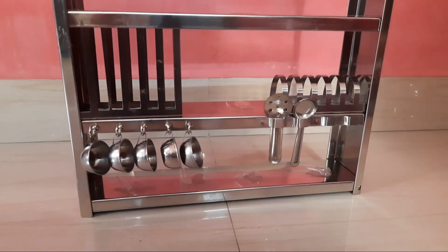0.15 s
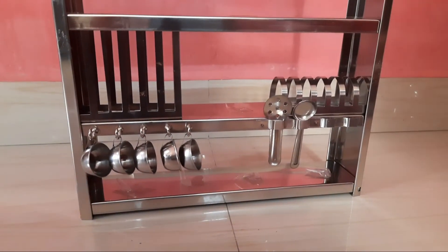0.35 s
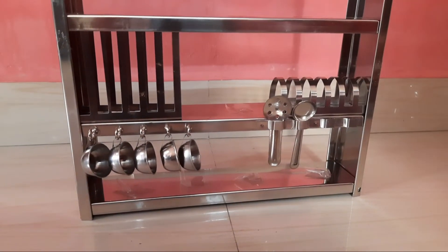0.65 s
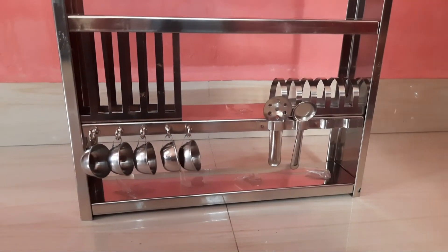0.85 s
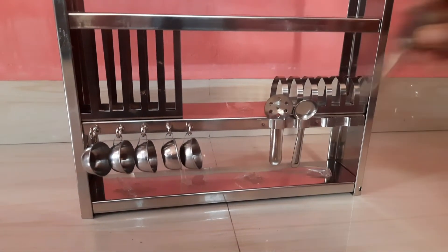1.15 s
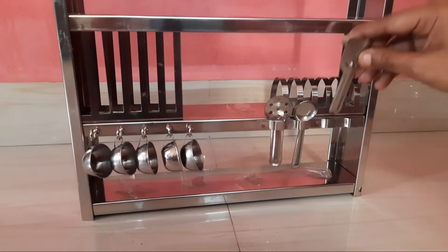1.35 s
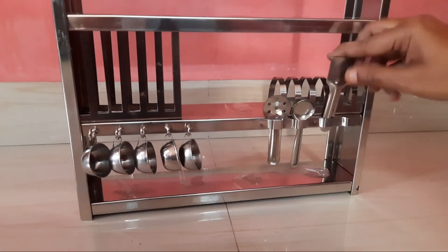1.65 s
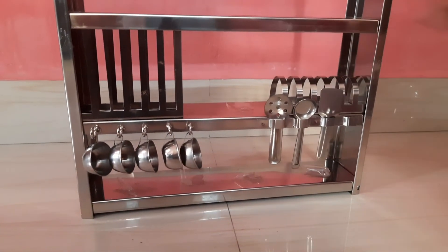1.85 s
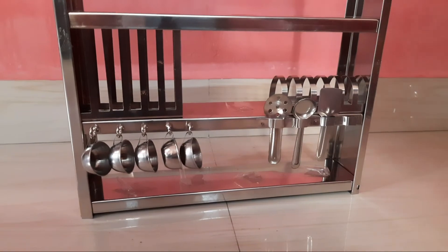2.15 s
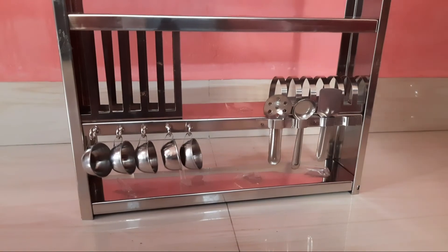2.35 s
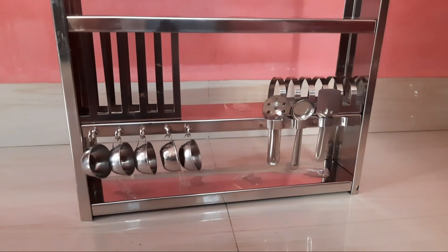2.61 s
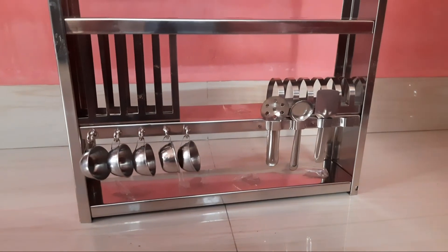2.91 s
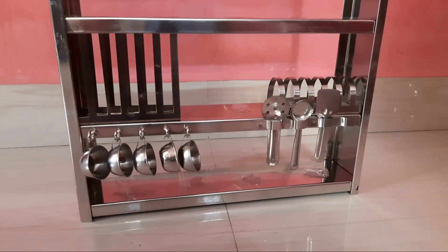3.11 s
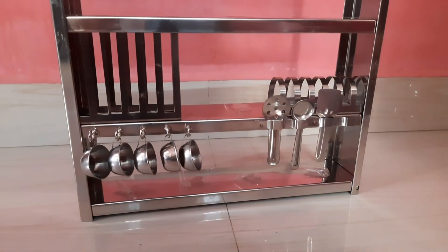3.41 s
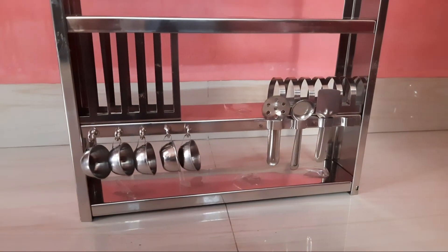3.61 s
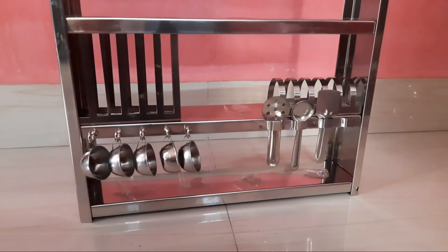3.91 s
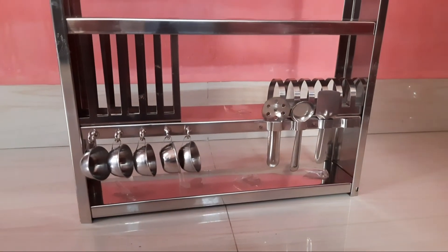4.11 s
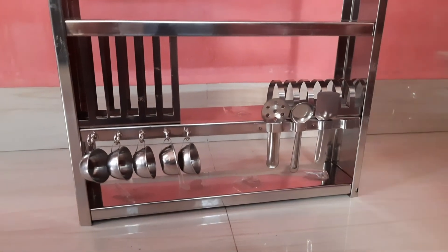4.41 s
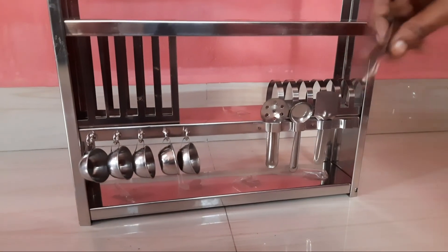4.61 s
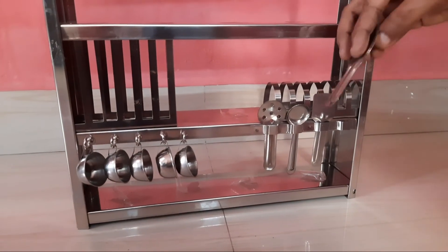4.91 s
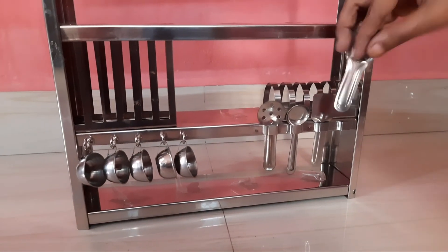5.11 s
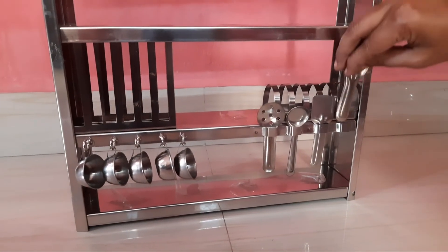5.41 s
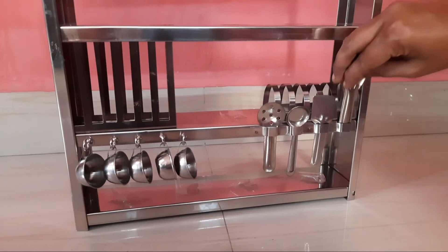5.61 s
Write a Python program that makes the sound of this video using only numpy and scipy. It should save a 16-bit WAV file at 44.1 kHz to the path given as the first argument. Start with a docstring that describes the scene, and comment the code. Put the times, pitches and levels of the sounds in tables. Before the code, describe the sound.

Close view of thin steel utensils handled at a metal rack in a small hard-walled room. Light spoon clinks come first, then a loud double clack as a turner drops in, more rattling spoons, and a long run of ladle clinks and scrapes. After a pause, only a few faint ticks. Short bright echoes, very faint hum.

```python
"""Small steel spoons, a turner and a ladle are knocked together and dropped into a sheet-steel rack. Each
contact is a short chatter of band-split noise ticks with two notes, and its force rings a bank of modes.
Sparser, softer ticks make the scraping and rattling in between; a few lasting rings are single decaying sines.
A small tiled room answers with decaying noise echoes, over a faint hum of shaped noise."""
import sys
import numpy as np
from scipy import signal
from scipy.fft import rfft, irfft, next_fast_len
from scipy.io import wavfile
from scipy.ndimage import uniform_filter1d, minimum_filter1d

SR = 44100
rng = np.random.default_rng(int(sys.argv[2]) if len(sys.argv) > 2 else 0)


def master_out(mix):
    """Clip the mix to full scale and print it as 16-bit PCM to the path in sys.argv[1]."""
    frames = np.transpose(np.atleast_2d(mix))
    ceiling = np.clip(frames, -1, 1)
    pcm = np.round(ceiling * 32767).astype(np.int16)
    wavfile.write(sys.argv[1], SR, pcm)


N = 253795
t = np.arange(N) / SR

# contacts of steel on steel; every level after level_db is relative to it [dB]:
# (start_s, level_db, thud_db, body_db, sheen_db, chatter_t60_s,
#  low_note_hz, low_note_db, high_note_hz, high_note_db, trembling_db)
HITS = [(0.055, -67, -23, -21, -4, 0.018, 1970, -17, 6900, -19, -12),
        (0.068, -33, -45, -42, -4.5, 0.03, 1950, -24.5, 7100, -17, -15.5),
        (0.087, -34, -46, -33, -10, 0.046, 3600, -22.5, 10700, -6, -26),
        (0.094, -18, -54, -30.5, -9, 0.024, 3700, -22, 9880, -9.5, -15.5),
        (0.101, -20.5, -46, -27, -10, 0.032, 3110, -33.5, 9100, -11.5, -13),
        (0.193, -17, -36.5, -23, -7.5, 0.016, 3530, -22.5, 6650, -11, -17.5),
        (0.2, -17, -30.5, -23.5, -11.5, 0.019, 3870, -17.5, 5060, -11.5, -12.5),
        (0.218, -29, -33, -17, -4, 0.043, 1360, -26, 10860, -8, -19),
        (0.252, -35, -35.5, -31, -4, 0.025, 2520, -15, 12300, -18, -11),
        (0.295, -37, -39, -39, 1, 0.037, 2070, -20.5, 13100, -8, -28),
        (0.326, -29.5, -29, -24, -8.5, 0.024, 2110, -25.5, 4100, -8, -8.5),
        (0.343, -33, -34, -14.5, -28, 0.065, 1360, -21, 4900, -13, -14),
        (0.377, -32.5, -36, -23, -5.5, 0.11, 1400, -17, 9870, -20, -9.5),
        (0.396, -18.5, -46.5, -23, -13.5, 0.11, 3530, -23.5, 7140, -14.5, -16.5),
        (0.41, -18, -36, -20, -9, 0.07, 1336, -18.5, 9000, -13, -6.5),
        (0.452, -15.5, -36.5, -13, -12.5, 0.039, 3040, -14, 11640, -13, -23),
        (0.483, -19, -40, -10.5, -9, 0.018, 1990, -14.5, 5500, -16, -11.5),
        (0.509, -24.5, -51, -17, -5.5, 0.038, 1980, -21, 7210, -10, -23),
        (0.62, -31, -41, -24, -13, 0.059, 1325, -25, 8080, -23, -2),
        (0.634, -19.5, -45, -36, -16, 0.032, 1340, -35, 4660, -14.5, -22),
        (0.653, -24, -53, -19, -3, 0.021, 1880, -21, 12430, -7.5, -15),
        (0.692, -41, -37, -17, -12, 0.031, 1410, -11, 11700, -18.5, -7),
        (0.867, -42.5, -29.5, -22, -14.5, 0.033, 1400, -26, 6460, -5, -1),
        (0.983, -49, -16.5, -4.5, -19, 0.012, 1410, -7, 5310, -15.5, -11),
        (1.277, -25, -49, -19, -8, 0.014, 1450, -15, 4550, -6.5, -6),
        (1.322, -28, -34, -13, -7.5, 0.043, 1640, -20, 7820, -24, -17),
        (1.382, -39, -21.5, -25, -4, 0.043, 2880, -15, 7360, -11.5, -11),
        (1.41, -25.5, -31.5, -9.5, -9, 0.11, 3680, -15.5, 3670, -29, -8),
        (1.445, -10.5, -39, -16, -13, 0.045, 2230, -12.5, 9430, -10, -5.5),
        (1.488, -18, -27.5, -1, -14, 0.014, 2250, -16.5, 4200, -12.5, -15),
        (1.672, -18.5, -34.5, -25, -18, 0.04, 2380, -15, 9100, -12, -10),
        (1.772, -22.5, -32, -15, -29, 0.071, 2290, -12, 8350, -16, -14),
        (1.835, 3, -36.5, -15, -14, 0.046, 2100, -22, 9500, -11.5, -6.5),
        (1.889, 5, -24, -15, -19, 0.012, 2230, -19.5, 8630, -17, -16),
        (2.259, -45.5, -19, -2, -16, 0.042, 1790, -6.5, 4250, -14, -18),
        (2.285, -34, -32, -18.5, -5.5, 0.046, 1867, -14, 10600, -16, -14),
        (2.298, -30.5, -29, -34, -22, 0.064, 988, -13, 9700, -26, -16),
        (2.323, -22, -51, -16.5, -12, 0.029, 1033, -14.5, 9640, -9.5, -14.5),
        (2.353, -26, -36, -11.5, -8, 0.021, 1430, -11, 5120, -10, -15),
        (2.383, -10, -43.5, -22, -10.5, 0.024, 3270, -16, 7250, -15.5, -44),
        (2.453, -36, -24, -25, -26, 0.051, 2170, -14.5, 5150, -14, -12.5),
        (2.47, -21.5, -26, -15, -15, 0.033, 2220, -17.5, 4090, -19, -16),
        (2.513, -26, -24, -10, -12, 0.08, 2050, -23.5, 11240, -14.5, -14),
        (2.574, -33, -31.5, -8, -27.5, 0.03, 1500, -9, 4160, -16, -25),
        (2.638, -35.5, -35, -23, -7, 0.11, 2134, -8.5, 4260, -4, -11.5),
        (2.662, -20, -47.5, -27, -22.5, 0.085, 2850, -11.5, 4100, -16, -21),
        (2.705, -8, -45, -10.5, -12, 0.032, 1210, -12.5, 5070, -24, -12),
        (2.726, -5.5, -43, -1.5, -11.5, 0.021, 1393, -2.5, 10720, -11, -20),
        (2.755, -13.5, -29, -19, -8, 0.028, 1330, -19.5, 4040, -7.5, -15),
        (2.767, 1.5, -43, -14.5, -17.5, 0.036, 1910, -16.5, 8920, -24, -16),
        (2.788, -21, -23, -14, -31, 0.016, 1930, -22.5, 4730, -11, -14.5),
        (2.818, -9, -19.5, -10.5, -16, 0.056, 2060, -21, 9630, -15, -18),
        (3.119, -44, -39, -20, -7, 0.06, 2860, -12, 7150, -16, -15),
        (3.131, -27, -38, -18, -14, 0.014, 1740, -12, 8400, -9, -8.5),
        (3.144, -37.5, -33.5, -11, 4.5, 0.025, 1490, -7.5, 12100, -6, -12),
        (3.181, -18, -33.5, -6, -4, 0.034, 1438, -7, 6220, -8, -15.5),
        (3.242, -6, -42.5, -18.5, -14.5, 0.036, 3470, -14.5, 3674, -14, -24.5),
        (3.295, -15.5, -29, -12, -39, 0.028, 1460, -13.5, 3600, -22.5, -10),
        (3.319, -7, -21.5, -30, -20, 0.032, 1330, -29, 8260, -21, -14),
        (3.344, -8, -17, -7.5, -11.5, 0.012, 1710, -3.5, 12500, -11, -10),
        (3.398, -14.5, -15, -4.5, -15, 0.027, 1840, -26, 4100, -27, -12),
        (3.47, -19.5, -49, -9.5, -13, 0.024, 1690, -10.5, 9160, -16, -6.5),
        (3.542, -20.5, -45, -14, -9, 0.013, 1980, -14, 5150, -24, -21),
        (3.579, -24, -43.5, -22, -13.5, 0.013, 2060, -17, 4870, -10.5, -2.5),
        (3.603, -28, -50, -21, -5, 0.033, 1680, -23, 6450, -4, -23),
        (3.614, -20.5, -53, -18.5, -10, 0.035, 1990, -25, 10000, -8, -6),
        (3.794, -30, -52, -20, -14.5, 0.11, 1730, -12, 9500, -9, -3),
        (3.827, -18, -54, -17, -10, 0.017, 2020, -17.5, 11900, -6, -15),
        (3.904, -25, -45, -21.5, -14, 0.11, 1930, -11.5, 14300, -11, 0.5),
        (3.94, -28, -44, -25, -16, 0.039, 1740, -8.5, 12100, -13, -11),
        (4.013, -31, -23.5, -30, -8, 0.041, 1970, -16, 4580, -10, -14),
        (4.06, -19, -25, -17, -23, 0.047, 1850, -20, 13500, -11.5, -2),
        (4.084, -21.5, -9, -15, -7.5, 0.038, 1577, -11, 11800, -24, -13.5),
        (4.104, -25.5, -27, -28, -15, 0.031, 1810, -7, 11900, -16, -16),
        (4.129, -21, -9.5, -12.5, -12, 0.018, 1640, -14.5, 13700, -9, -12.5),
        (4.208, -12.5, -35, -25.5, -16.5, 0.039, 3250, -28, 4580, -25.5, -30),
        (4.23, -35.5, -29, -29, -36, 0.07, 1880, -19, 12000, -12, -11),
        (4.324, -40.5, -39.5, -22, -15, 0.031, 3190, -22, 4690, -12, -17),
        (4.522, -43.5, -12.5, -29, -9.5, 0.026, 1030, -26, 8370, -6.5, -12.5),
        (5.548, -59, -22.5, -10.5, 0, 0.025, 2400, -8, 7975, -16, -3),
        (5.576, -31, -48, -23, -11.5, 0.023, 2350, -11, 9460, -5.5, -5),
        (5.696, -35, -40, -15, -15, 0.04, 2155, -12, 9140, -7.5, -14)]

# resonant modes of each piece, before the random scatter: (pitch_hz, level_db, t60_s)
SPOONS = [(1375, -16, 0.19), (2030, -20, 0.079), (2790, -16, 0.12), (2935, -3, 0.24), (3320, -9, .05),
          (3830, -5, 0.093), (4450, -11.5, 0.025), (4870, -2.5, 0.065), (5300, 0, 0.016), (7340, -2, 0.12),
          (7870, -6, 0.081), (9100, -5, 0.051), (11300, -10, 0.051), (11470, -12.5, .05),
          (15080, -8, 0.033)]
TURNER = [(1425, -16.5, 0.011), (1680, -12, 0.023), (2253, -13, 0.045), (2390, -7.5, 0.0037),
          (3820, -6, 0.03), (4300, -8.5, 0.013), (7710, -19.5, .008), (8200, -3, 0.019), (8740, -13, 0.008)]
LADLE = [(1773, -15, 0.15), (3150, -15, 0.031), (4646, -11, 0.028), (5090, -11.5, 0.056), (6400, -59, 0.09),
         (7600, -56, 0.06), (8920, -19, 0.025), (8720, -6, 0.022), (9020, -11.5, 0.072),
         (11900, -22, 0.037), (11900, -8, 0.0308), (13900, -30, .04), (14620, -36, 0.037),
         (15290, -13, .04)]

# which piece is in hand: (start_s, end_s, modes of the piece)
IN_HAND = [(0, 1.1, SPOONS), (1.1, 2.24, TURNER), (2.24, 3.1, SPOONS), (3.1, 5, LADLE), (5, 6, TURNER)]

# timbre of each row of IN_HAND, all relative levels [dB]:
# (low_body_db against body, edge_db against the mean of body and sheen, air_db against sheen,
#  contact_ring_db against the burst, rattle_ring_db against the rattle)
TONE = [(-6, 1, -1.5, -34.5, -17), (-5.5, -1.5, -4, -24, -9), (-4.5, -4, -1.5, -19.5, -10.5),
        (-12.5, 0, 0, -9.5, -5), (-9, -3, -7, -28.5, -7)]


def undb(db):
    """Decibels to amplitude."""
    return 10 ** (np.asarray(db, float) / 20)


def unit(x):
    """Scale to an RMS of one."""
    return x / np.sqrt(np.mean(x ** 2))


def smoothed(x, size):
    """Two running means leave only slow movement."""
    return uniform_filter1d(uniform_filter1d(x, size=size), size=size)


def fade(s, t60):
    """Exponential decay, 60 dB down after t60 seconds (at least 3 ms)."""
    return np.exp(-np.log(1000) * s / max(t60, .003))


def band(x, lo_hz, hi_hz):
    """Keep the sound between two frequencies."""
    return signal.sosfilt(signal.butter(3, [lo_hz, hi_hz], "bandpass", fs=SR, output="sos"), x)


def piece_at(at):
    """Row number of the piece in hand at a time."""
    return np.searchsorted([end_s for _, end_s, _ in IN_HAND], at)


def colour(at, thud_db, body_db, sheen_db):
    """Amplitudes of the six tick bands: the piece in hand sets how the bands between and above follow."""
    low_body_db, edge_db, air_db = TONE[piece_at(at)][:3]
    middle_db = (body_db + sheen_db) / 2
    return undb([thud_db, body_db + low_body_db, body_db, middle_db + edge_db, sheen_db, sheen_db + air_db])


def ticks(rate, scatter_db, smooth):
    """Dense uneven micro-contacts over even scraping noise, split into bands of equal level."""
    # thud, low body, body, edge, sheen and air: (from_hz, to_hz)
    tick_bands = [(390, 830), (830, 1250), (1250, 2600), (3100, 6000), (6000, 10000), (10000, 16500)]
    chance = rng.random(N)
    size = np.minimum(rng.exponential(size=N), 3.)
    sign = rng.standard_normal(N)
    touches = unit((chance < rate / SR) * undb(scatter_db * size) * sign)
    x = touches + smooth * rng.standard_normal(N)
    return np.array([unit(band(x, lo_hz, hi_hz)) for lo_hz, hi_hz in tick_bands])


def hits(rise_s=0.002, split=0.025, crack_db=-7.0, crack_t60=0.0013, note_lasts=1.3):
    """Each contact chatters and sounds two beating notes; its chatter is also the force on the piece."""
    s = t[:SR // 3]
    grain = np.pad(ticks(rate=6000, scatter_db=2.5, smooth=.8), ((0, 0), (0, len(s))))
    sound, force = np.zeros(N + len(s)), np.zeros(N + len(s))
    # pitch ratios of three neighbour modes for both notes of each contact
    spread = 1 + split * rng.standard_normal((len(HITS), 2, 3, 1))
    for hit, neighbours in zip(HITS, spread):
        at, db, *colour_db, t60, low_hz, low_db, high_hz, high_db, _ = hit
        i = int(at * SR)
        rise = undb(db) * np.minimum(s / rise_s, 1)
        # the first touch cracks sharply, then the chatter dies away
        shape = fade(s, t60) + undb(crack_db) * fade(s, crack_t60)
        burst = rise * shape * (colour(at, *colour_db) @ grain[:, i:i + len(s)])
        # each note has weaker neighbour modes that beat against it
        pair = []
        for hz, ratios in zip((low_hz, high_hz), neighbours):
            beating = np.sin(2 * np.pi * hz * ratios * s).sum(axis=0)
            pair.append(np.sin(2 * np.pi * hz * s) + 0.45 * beating)
        notes = undb([low_db, high_db]) @ pair
        # a note outlasts its chatter by the factor note_lasts
        sound[i:i + len(s)] += burst + rise * fade(s, note_lasts * t60) * notes
        contact_ring_db = TONE[piece_at(at)][3]
        force[i:i + len(s)] += burst * undb(contact_ring_db)
    return sound[:N], force[:N]


def mode(x, hz, t60):
    """One resonance whose pitch may step; white noise comes out at the level it went in."""
    r = fade(1 / SR, t60)
    turn = np.exp(2j * np.pi * np.cumsum(hz) / SR)
    ringing = turn * signal.lfilter([1], [1, -r], x / turn)
    return np.sqrt(2 * (1 - r * r)) * ringing.imag


def ring(force, scatter_db=7.0, shift=0.006):
    """The piece in hand rings; every contact draws random mode levels and small random pitch shifts."""
    contact_number = np.searchsorted([row[0] for row in HITS], t)
    out = np.zeros(N)
    for start_s, end_s, piece in IN_HAND:
        # the force stops at end_s and the modes get 0.4 s more to die away
        a, b = int(start_s * SR), int((end_s + .4) * SR)
        push = (force * (t < end_s))[a:b]
        for hz, db, t60 in piece:
            draws = rng.standard_normal((len(HITS) + 1, 2))
            level_draw, pitch_draw = draws[contact_number[a:b]].T
            out[a:b] += mode(push * undb(db + scatter_db * level_draw), hz * (1 + shift * pitch_draw), t60)
    return out


def rattle(lag_s=0.0045, jolt_t60_s=0.27):
    """Loose pieces slide against steel, and tremble a moment after every contact; returns sound and force."""
    # sliding between contacts, one curve per movement, levels before the rattle trim:
    # (time_s, sheen_db, body_db, thud_db)
    slides = [
        [(0.06, -89, -75, -87), (0.13, -84, -59, -83), (0.242, -71.5, -60.5, -74), (0.348, -48.5, -65, -76),
         (0.542, -55, -56.5, -75), (0.716, -69, -76.5, -69), (0.8, -86, -82, -80)],
        [(1.27, -81, -63, -71.5), (1.33, -75.5, -72, -72), (1.446, -55, -49, -71), (1.498, -54, -40, -67),
         (1.626, -57.5, -46.5, -67.5), (1.78, -52.5, -47.5, -64.5), (1.83, -47, -30.5, -62)],
        [(1.84, -56, -42, -65), (1.906, -53, -39, -61), (1.958, -42.5, -33, -53), (2.084, -56.5, -49, -63),
         (2.15, -74.5, -60, -65)],
        [(2.25, -70.5, -59.5, -53.5), (2.336, -67.5, -55, -68.5), (2.464, -49.5, -48.5, -86),
         (2.574, -52, -47, -74), (2.7, -46, -49.5, -68)],
        [(2.71, -48.5, -56, -64), (2.812, -46, -32, -65), (2.948, -57, -47.5, -73.5), (3.0, -58.5, -50, -89)],
        [(3.12, -61, -68, -77), (3.214, -61, -72.5, -86), (3.306, -46, -43, -65), (3.364, -22, -48, -62.5),
         (3.494, -63, -44.5, -62), (3.612, -50, -60.5, -75), (3.78, -56.5, -60.5, -76)],
        [(3.79, -49, -67.5, -76), (3.852, -46, -47.5, -71), (4.012, -47.5, -50, -62), (4.1, -46, -49, -59),
         (4.19, -61, -65, -67), (4.26, -69, -71, -71), (4.35, -83, -86, -66)],
        [(5.5, -92, -83, -84), (5.604, -81, -55.5, -84), (5.668, -51, -66, -83), (5.722, -62, -60, -81),
         (5.75, -72, -62, -75)],
    ]
    s = t[:SR // 2]
    grain = ticks(rate=1800, scatter_db=1.3, smooth=0.93)
    power = np.zeros((len(grain), N + SR))
    for rows in slides:
        at, sheen_db, body_db, thud_db = np.transpose(rows)
        curves = [np.interp(t, at, db) for db in (thud_db, body_db, sheen_db)]
        moving = (t > at[0]) & (t < at[-1])
        power[:, :N] += moving * colour(at[0], *curves) ** 2
    for at, db, thud_db, body_db, sheen_db, *_, trembling_db in HITS:
        i = int((at + lag_s) * SR)
        trembling = undb(db + trembling_db) * fade(s, jolt_t60_s)
        power[:, i:i + len(s)] += np.outer(colour(at, thud_db, body_db, sheen_db), trembling) ** 2
    sound = (np.sqrt(power[:, :N]) * grain).sum(axis=0)
    rattle_ring_db = np.array(TONE)[piece_at(t), 4]
    return sound, sound * undb(rattle_ring_db)


def singing(flutter_db_per_khz=.5):
    """A few lasting rings, each a single decaying sine; higher tones waver more in level, at random."""
    # single modes, levels before the flutter: (start_s, pitch_hz, level_db, rise_s, t60_s)
    lasting_rings = [(0, 1976, -57.5, 0.0032, 0.12), (.1, 2020, -49, .03, .5),
                     (.3, 1370, -48.5, 0.033, 0.8), (.66, 4300, -62, .02, 0.79),
                     (1.132, 460, -56.5, 0.023, 0.6), (1.23, 4320, -63, 0.015, 0.62),
                     (3.245, 3470, -56, .004, 0.13), (3.475, 1986, -28, 0.0045, 0.27),
                     (3.615, 1986, -40.5, 0.0054, 0.83), (4.064, 554, -21, 0.001, 0.043),
                     (4.066, 419.4, -38, 0.0021, 0.13), (4.068, 715, -47.5, 0.015, 0.69),
                     (4.086, 11830, -24, 0.011, 0.16), (4.086, 13740, -22, 0.018, 0.14),
                     (4.086, 15200, -28, 0.014, 0.15), (5.51, 1160, -56.5, 0.016, 0.19)]
    out, s = np.zeros(N + SR), t[:SR]
    for at, hz, db, rise_s, t60 in lasting_rings:
        i = int(at * SR)
        flutter = unit(smoothed(rng.standard_normal(SR), SR // 100))
        level = undb(db + flutter_db_per_khz * hz / 1000 * flutter)
        envelope = (1 - np.exp(-s / rise_s)) * fade(s, t60)
        out[i:i + SR] += level * envelope * np.sin(2 * np.pi * hz * s)
    return out[:N]


def room(x, gap_s=0.0016, build_s=0.0018):
    """Dense echoes of hard walls: noise in eight bands, each with its own decay, after a brief gap."""
    # echo bands, levels relative to each other: (centre_hz, t60_s, level_db)
    echo_bands = [(390, 0.17, 4), (1140, 0.15, -5.5), (1880, 0.33, 2), (4100, 0.41, -2),
                  (6500, 0.21, -10.5), (8700, 0.41, -4.5), (11800, 0.18, 0), (14700, .18, -2.5)]
    # each band reaches this frequency ratio to both sides of its centre
    reach = (1.5, 1.45, 1.4, 1.3, 1.22, 1.18, 1.14, 1.12)
    s = t[:int(.7 * SR)]
    onset = np.clip((s - gap_s) / build_s, 0, 1)
    tail = 0
    for (hz, t60, db), wide in zip(echo_bands, reach):
        echoes = band(rng.standard_normal(len(s)), hz / wide, hz * wide)
        # the root of t60 keeps long and short decays at like energy
        tail = tail + undb(db) * fade(s, t60) * echoes / np.sqrt(t60)
    return signal.fftconvolve(x, onset * tail / np.sqrt(np.sum(tail ** 2)))[:N]


def hum(level_db=-66.5, waver_db=1.):
    """Faint steady house noise, shaped in the spectrum, whose level wavers a little."""
    # spectrum shape, levels relative to each other: (frequency_hz, density_db per Hz)
    hum_shape = [(25, -32.5), (40, -10), (60, -4), (110, -4.5), (170, -10), (250, -8), (350, -16.5),
                 (450, -12.5), (600, -18.5), (1400, -18.5), (2200, -22.5), (3000, -31.5), (5500, -39.5),
                 (9000, -38), (13000, -44), (16000, -52)]
    hz, db = np.transpose(hum_shape)
    size = next_fast_len(N)
    f = np.maximum(np.arange(size // 2 + 1) * SR / size, 1)
    gain = undb(np.interp(np.log(f), np.log(hz), db))
    x = irfft(rfft(rng.standard_normal(size)) * gain, size)[:N]
    waver = unit(smoothed(rng.standard_normal(N), SR // 5))
    return unit(x) * undb(level_db + waver_db * waver)


def scene(rattle_db=-6, room_db=-6, low_hz=380):
    """Contacts, rattle, ringing and lasting rings, then their echoes and the hum."""
    blows, push = hits()
    scrape, rub = undb(rattle_db) * np.array(rattle())
    steel = blows + scrape + ring(push + rub) + singing()
    # pieces this small radiate no bass
    steel = signal.sosfilt(signal.butter(4, low_hz, "highpass", fs=SR, output="sos"), steel)
    return (steel + undb(room_db) * room(steel) + hum())[None]


def record(dry, ceiling=.86, shelf_hz=15550, top_hz=16700):
    """A limiter holds the loudest blows; the top of the treble is shelved down, then cut."""
    # the gain dips ahead of a peak and recovers after it
    gain = minimum_filter1d(ceiling / np.maximum(np.abs(dry), ceiling), size=257)
    held = dry * uniform_filter1d(gain, size=129)
    shelf = signal.ellip(6, .2, 28, shelf_hz, fs=SR, output="sos")  # 28 dB down
    cut = signal.ellip(8, .2, 70, top_hz, fs=SR, output="sos")  # 70 dB down
    return signal.sosfilt(cut, signal.sosfilt(shelf, held))


dry = scene()
out = record(dry)
master_out(out)
```